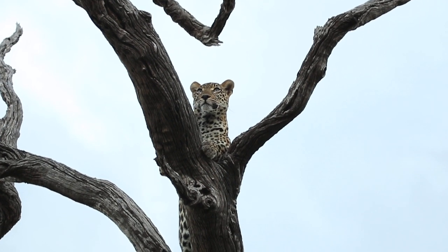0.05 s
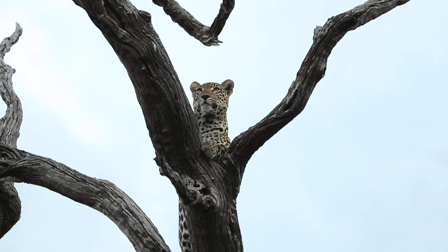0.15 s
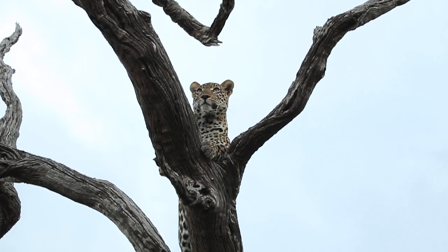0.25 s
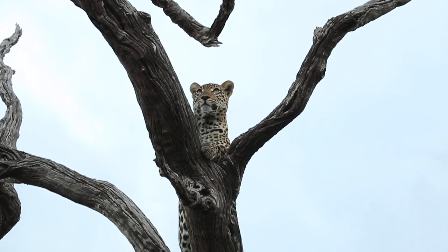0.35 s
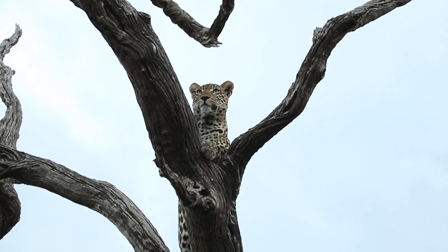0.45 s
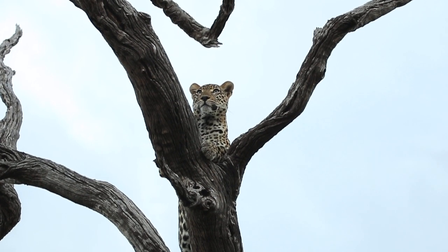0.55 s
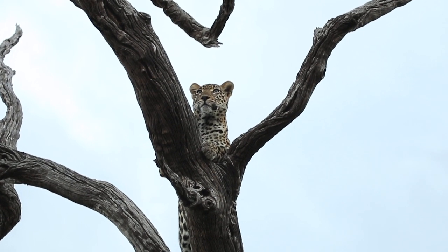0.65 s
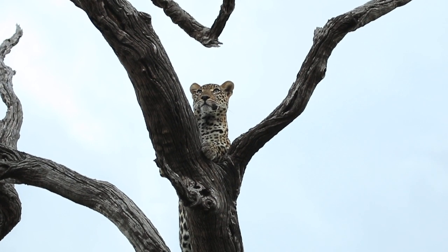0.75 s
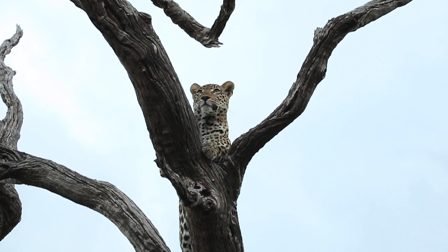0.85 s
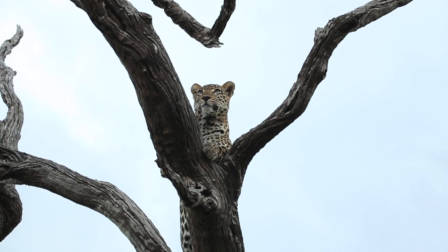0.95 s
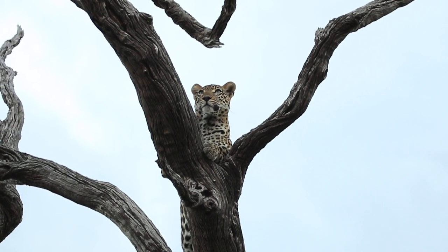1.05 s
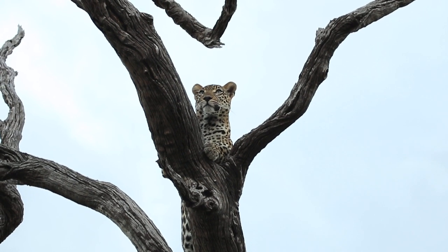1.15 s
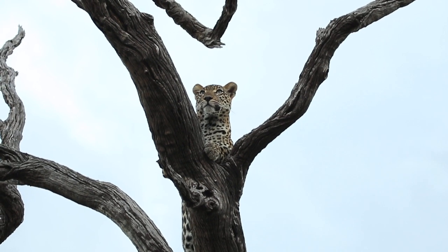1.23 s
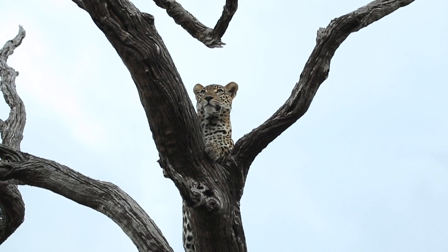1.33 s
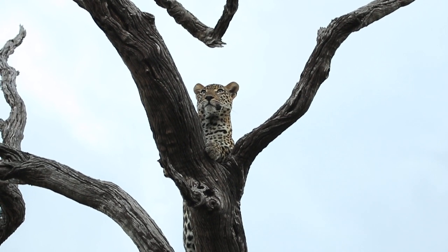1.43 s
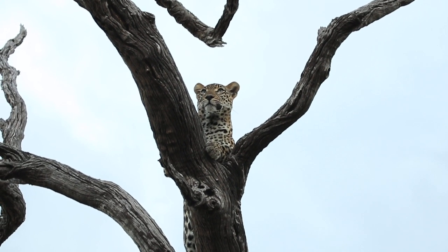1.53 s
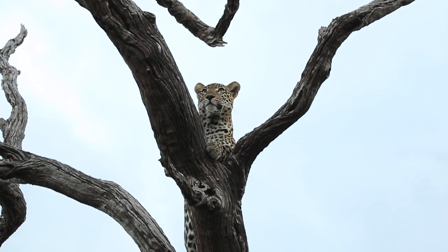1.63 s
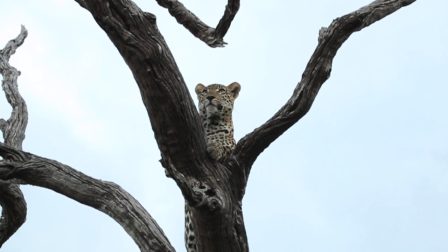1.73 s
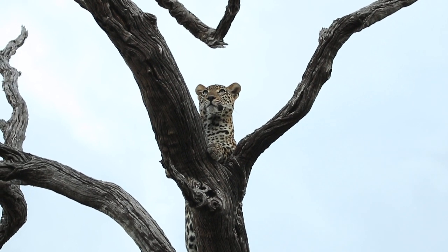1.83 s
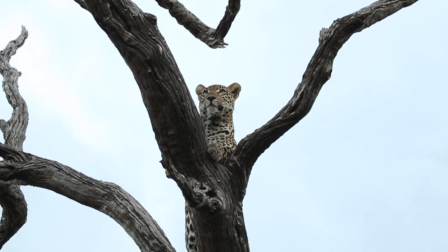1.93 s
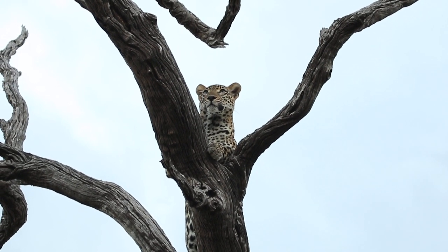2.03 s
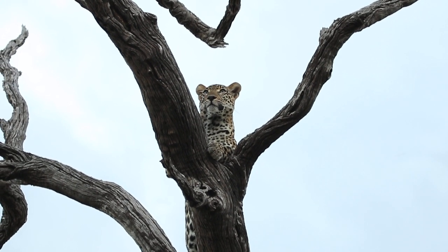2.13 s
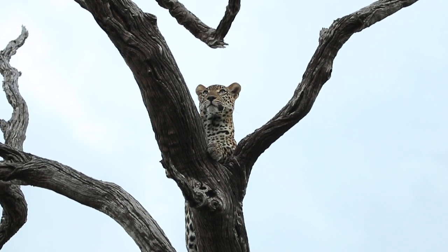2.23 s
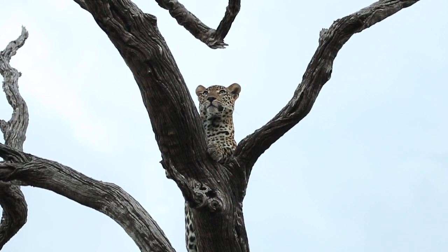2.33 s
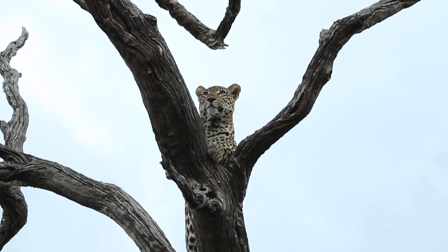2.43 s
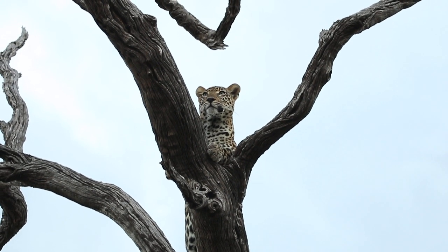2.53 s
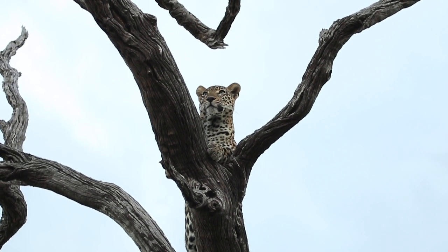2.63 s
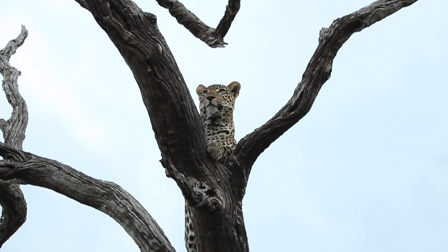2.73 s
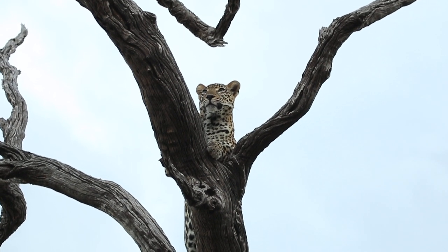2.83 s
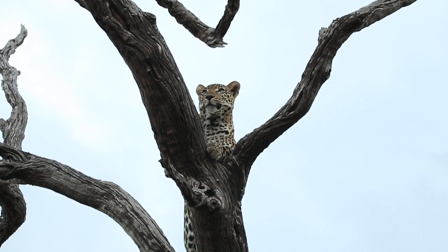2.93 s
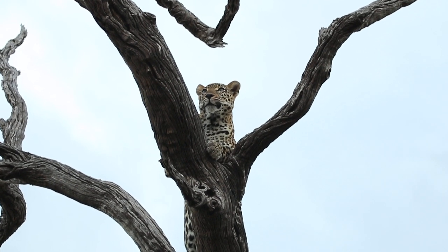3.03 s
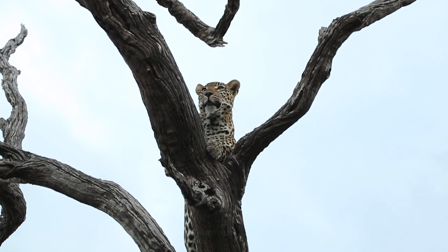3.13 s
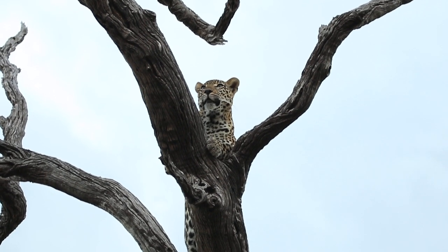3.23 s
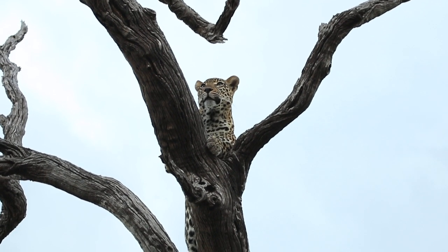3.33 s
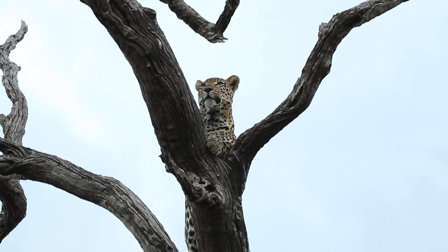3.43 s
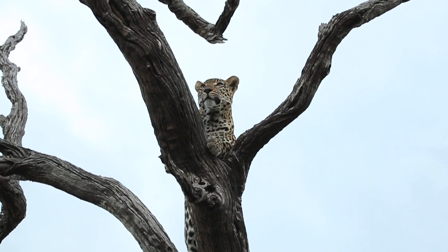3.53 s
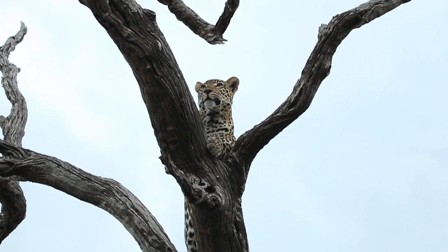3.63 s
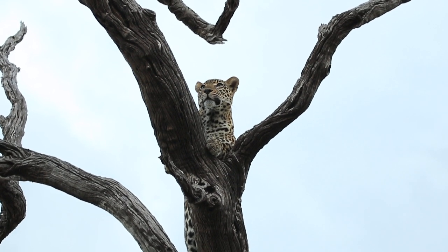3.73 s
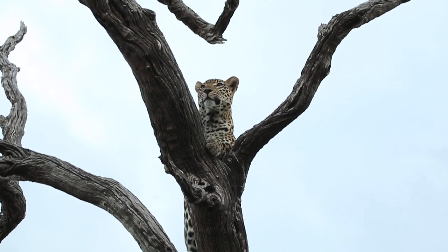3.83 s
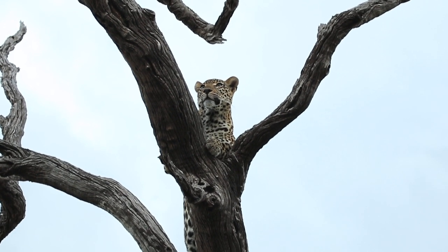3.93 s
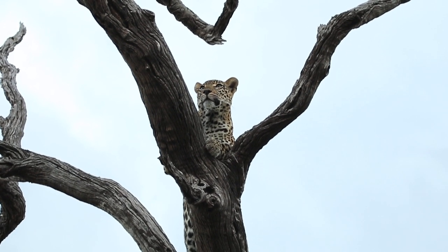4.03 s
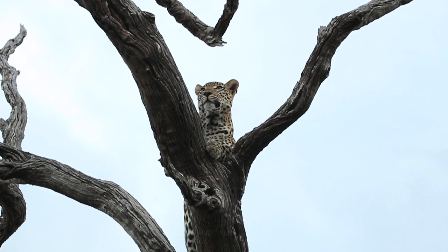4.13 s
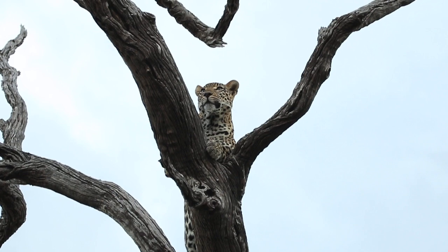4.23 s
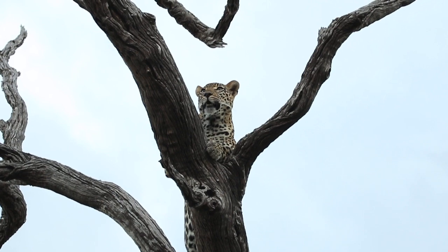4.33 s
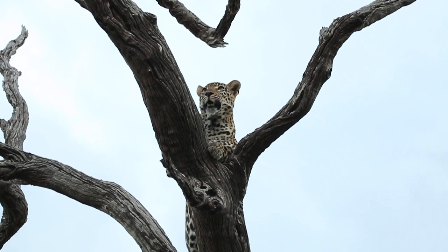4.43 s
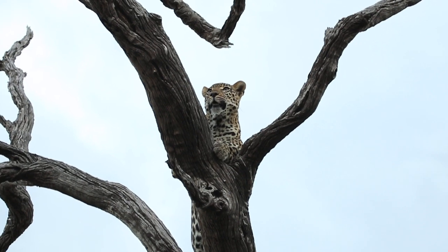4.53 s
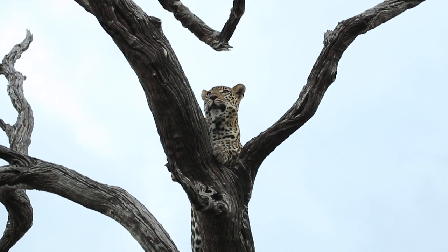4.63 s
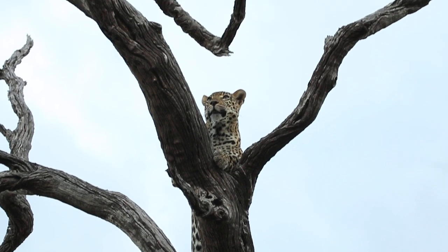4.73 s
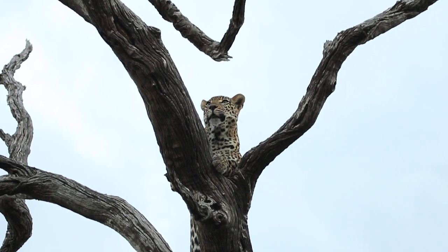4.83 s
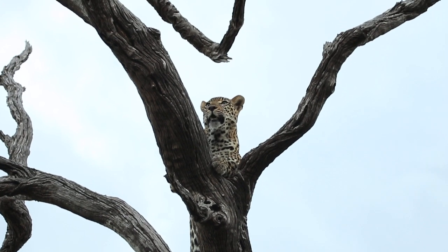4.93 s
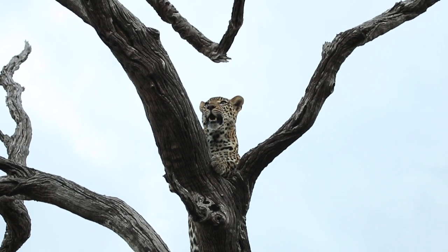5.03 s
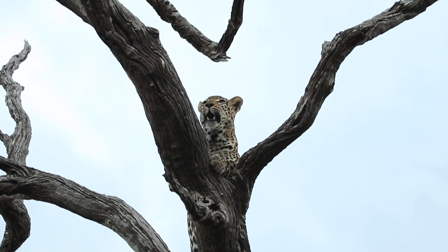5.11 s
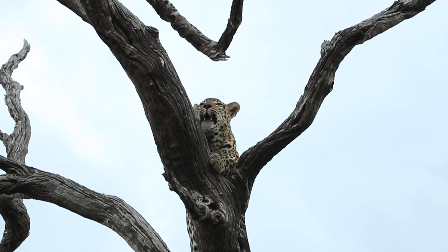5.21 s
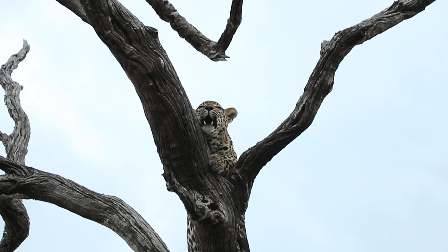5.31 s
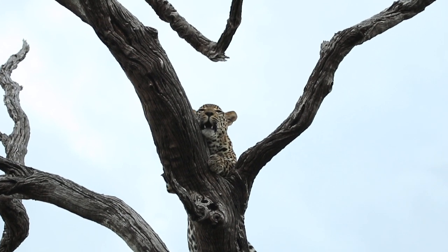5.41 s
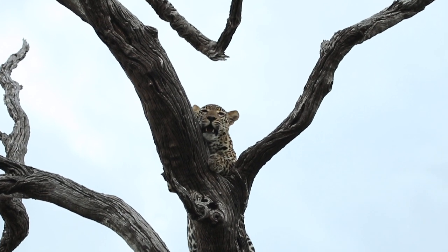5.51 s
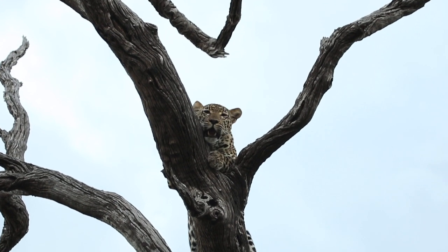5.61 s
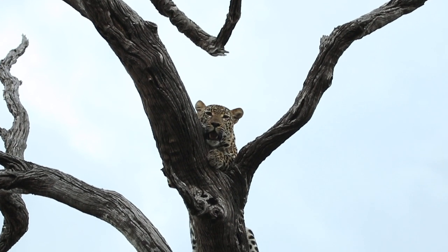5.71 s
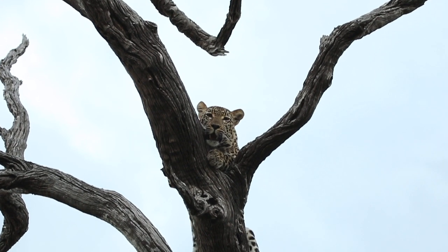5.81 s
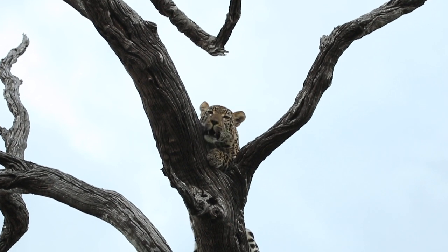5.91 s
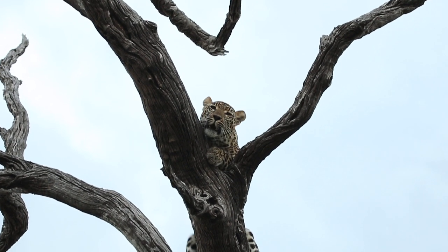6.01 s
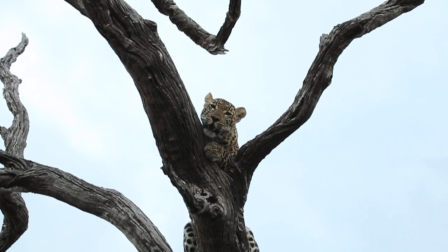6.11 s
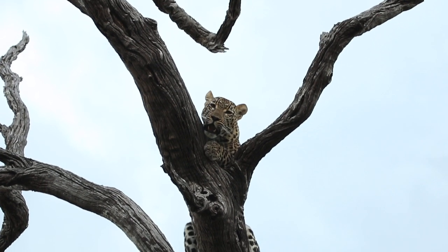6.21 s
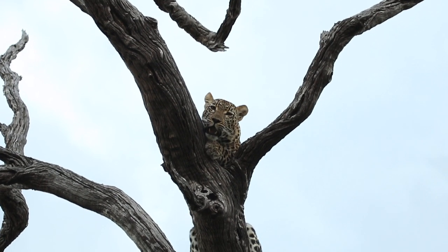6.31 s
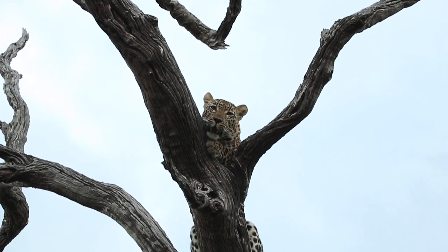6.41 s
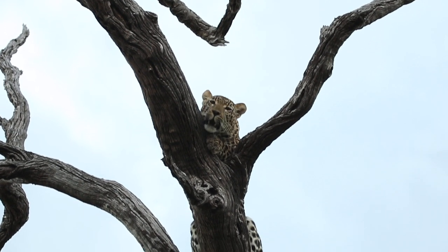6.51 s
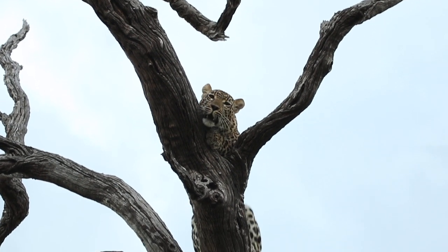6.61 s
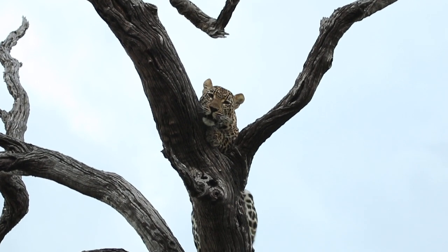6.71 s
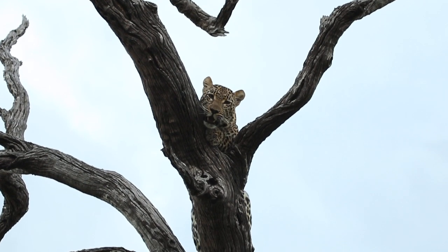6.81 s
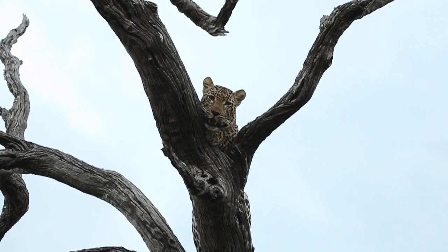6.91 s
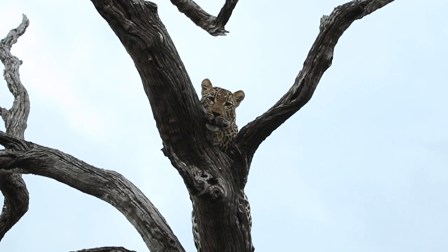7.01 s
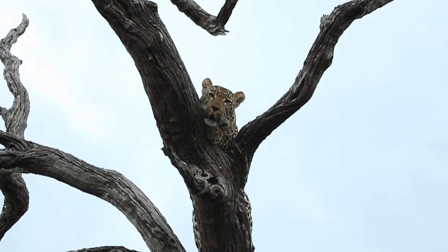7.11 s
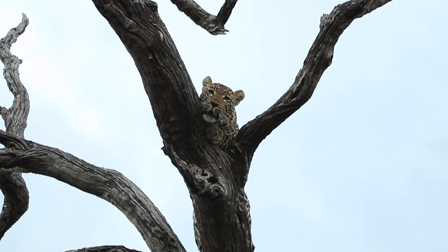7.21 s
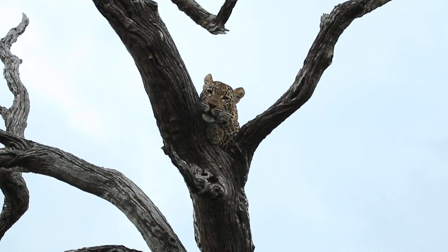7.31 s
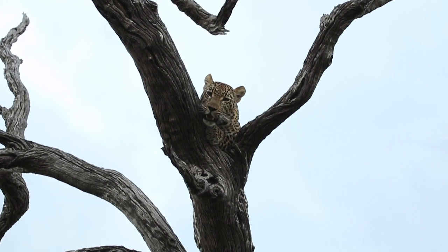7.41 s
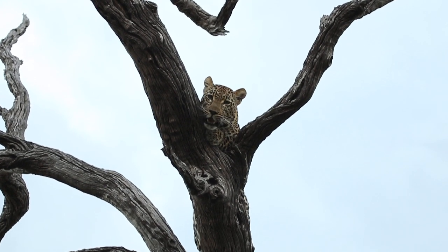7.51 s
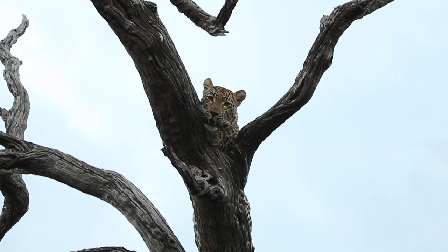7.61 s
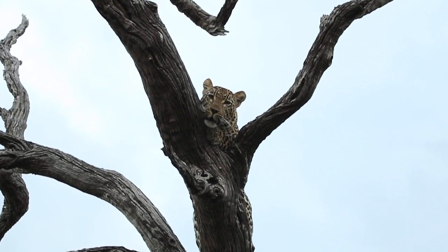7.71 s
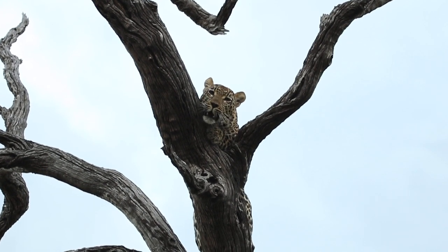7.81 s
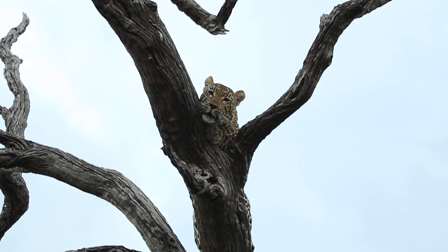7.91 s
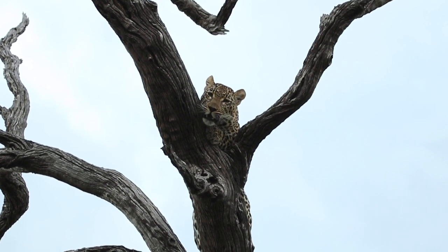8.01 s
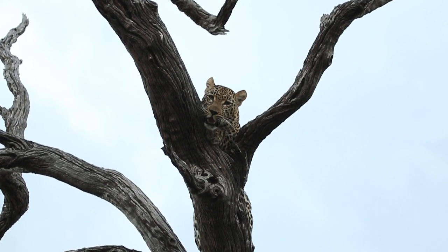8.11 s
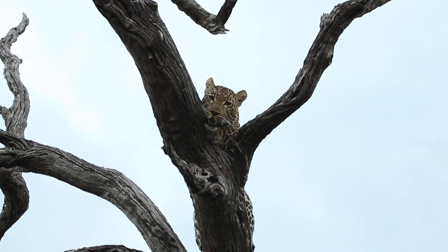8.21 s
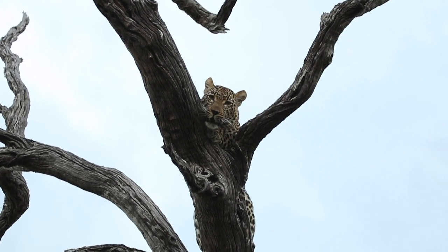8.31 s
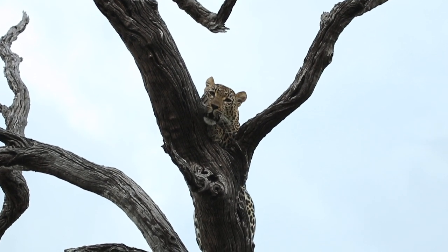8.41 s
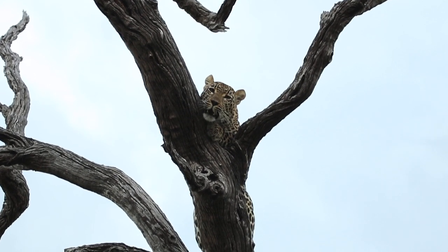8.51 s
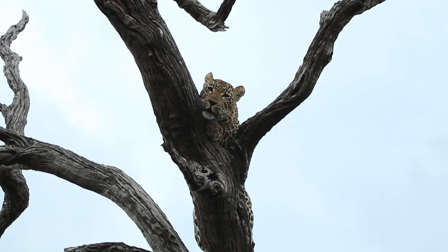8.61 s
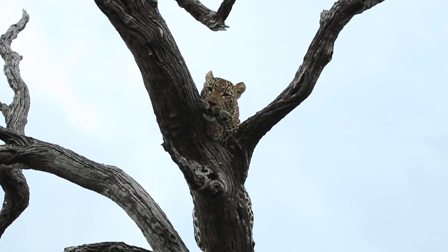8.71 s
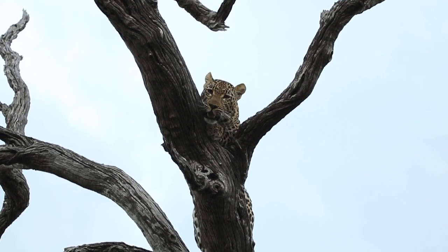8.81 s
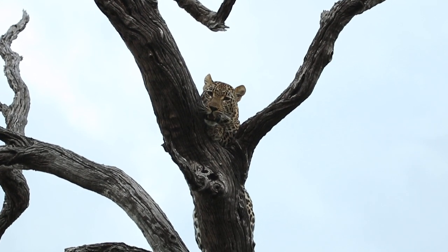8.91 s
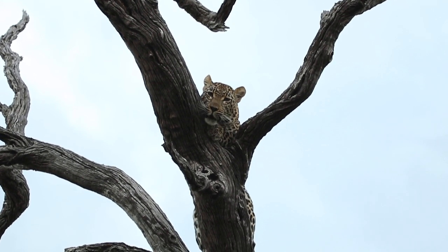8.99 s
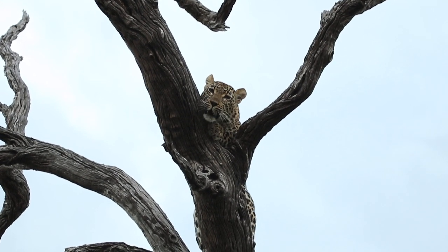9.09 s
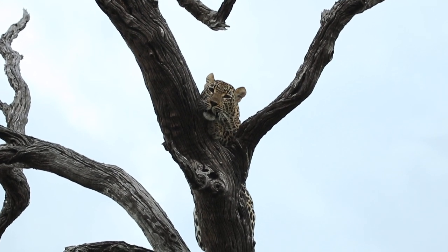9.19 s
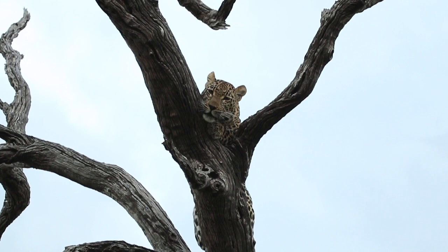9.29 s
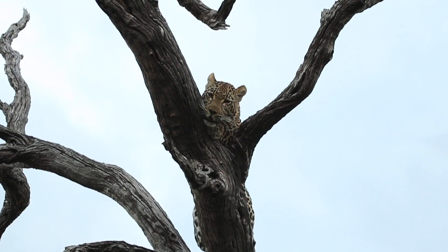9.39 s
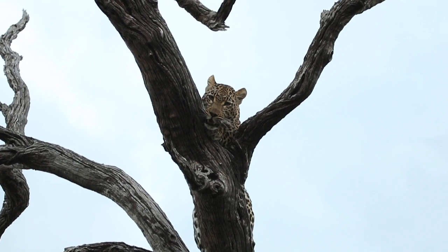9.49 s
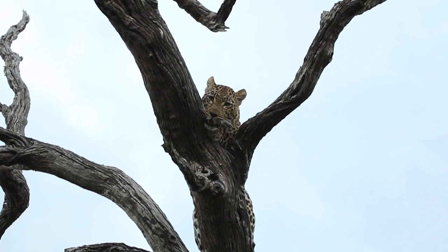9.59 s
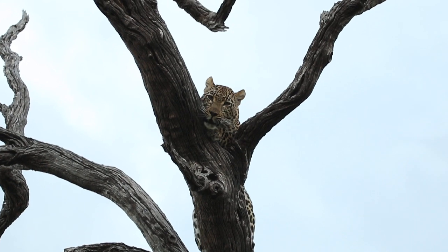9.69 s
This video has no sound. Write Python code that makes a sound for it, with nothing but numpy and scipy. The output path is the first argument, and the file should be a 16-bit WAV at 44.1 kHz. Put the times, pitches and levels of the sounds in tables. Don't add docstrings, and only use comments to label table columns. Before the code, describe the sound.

Outdoors in quiet bush, a low steady wash of air lies very faintly behind everything. In the first 1.2 seconds a distant dove gives soft gliding coos, the first one rolled. A small bird ticks, high and thin, about every 0.3 seconds with pauses until 4.9, while insects trill in fine buzzing strands. Dry twigs click at 2.6 and 3.1, more sharply at 3.7 and 4.05, faintly at 4.8. A soft animal breath comes at 4.4-5.0, then a rattling one at 5.1. From 5.35 the leopard coughs loudly: rough, chesty, buzzing bursts of roughly 0.2 seconds at 5.35, 5.95, 6.55, 7.15, 7.8, 8.45 (softer) and 9.1. Between them come hoarse, fluttering inhalations with slow throaty flaps and wet snaps. A last rattling breath fades around 9.8. Close, dry sound, faint short echoes.

```python
import sys
import numpy as np
from scipy import signal
from scipy.fft import rfft, irfft, next_fast_len
from scipy.io import wavfile
from scipy.ndimage import uniform_filter1d, map_coordinates

SR = 44100
rng = np.random.default_rng(int(sys.argv[2]) if len(sys.argv) > 2 else 0)


def gain_from_db(level_db):
    decades = np.asarray(level_db, float) / 20
    return 10 ** decades


def to_wav(s):
    ch = np.atleast_2d(s).T
    pcm = np.round(np.clip(ch, -1, 1) * 32767)
    wavfile.write(sys.argv[1], SR, pcm.astype(np.int16))


N = 429975
TIME = np.arange(N) / SR

# folds burst open [t/s], rise to peak [s], length to release [s], peak [level/dB], widest jaw [0-1]
COUGH_EVENTS = [
    (5.348, 0.027, 0.15, -12, 0.92),
    (5.961, .01, 0.17, -11, 1.2),
    (6.559, 0.016, 0.19, -12, 0.8),
    (7.156, 0.025, 0.19, -13, 0.83),
    (7.777, 0.025, 0.2194, -12, 0.65),
    (8.461, .02, .19, -15.5, 1.15),
    (9.114, 0.013, 0.23, -12, 0.87),
]
# chest leads burst [s], first push eases over [s], by [dB], release [s], final jaw opening [share]
COUGH_EDGES = [(0.022, 0.033, -3, 0.075, 2.3), (0.021, 0.055, -7, 0.0607, .8), (.016, 0.059, -6, .05, .3),
               (0.021, .04, -4, 0.039, .6), (0.0134, 0.066, -4.5, 0.0537, .1), (0.0274, .07, -1, .09, .1),
               (0.029, .06, -4, .065, .3)]
# [f/Hz], width [Hz], [level/dB]
THROAT_IN_MODES = [(637, 130, -9), (766, 29.6, 3), (900, 93, -6), (1144, 12.4, 2)]
MOUTH_IN_MODES = [(1930, 47, -5.5), (2368, 100, 0.5), (2800, 220, -1), (3150, 210, 0), (3840, 40, 3)]
HISS_IN_MODES = [(4650, 54, -2.5), (5070, 130, 0.5), (6020, 370, -0.5), (6820, 330, -3), (7480, 590, -6.5),
                 (9850, 2500, -9.5)]


def unit(x):
    return x / np.sqrt(np.mean(x ** 2) + 1e-20)


def filtered(x, response):
    m = next_fast_len(len(x) + 8192)
    spectrum = rfft(x, m) * response(np.fft.rfftfreq(m, 1 / SR))
    return irfft(spectrum, m)[:len(x)]


def band(x, low_hz, high_hz):
    sos = signal.butter(3, [low_hz, high_hz], "band", fs=SR, output="sos")
    return unit(signal.sosfilt(sos, x))


def colour(points):
    f, db = np.transpose(points)
    return lambda hz: gain_from_db(np.interp(np.log(hz + 1), np.log(f), db))


def airway(modes, sign=-1):
    return lambda f: sum(sign ** k * gain_from_db(db) * 1j * f * w / (c * c - f * f + 1j * f * w)
                         for k, (c, w, db) in enumerate(modes))


def curves(tables):
    s, *cols = np.transpose(np.concatenate(tables))
    gate = sum((TIME > t[0][0]) & (TIME < t[-1][0]) for t in tables)
    return uniform_filter1d(gate * 1., size=200), *[np.interp(TIME, s, c) for c in cols]


def wobble(rate_hz):
    knots = rng.standard_normal(int(N * rate_hz / SR) + 4)
    return map_coordinates(knots, [TIME * rate_hz])


def patchy(depth_db):
    z = signal.stft(rng.standard_normal(N), nperseg=256)[2]
    field = uniform_filter1d(rng.standard_normal(z.shape), size=2, axis=0)
    field = uniform_filter1d(field, size=7, axis=1)
    return unit(signal.istft(z * gain_from_db(depth_db * unit(field)), nperseg=256)[1][:N])


def rings(s, gain, hz, t60_s, attack_s):
    t = np.arange(SR // 10) / SR
    wave = np.sin(2 * np.pi * np.outer(hz, t)) * gain_from_db(-60 * t / t60_s) * (1 - np.exp(-t / attack_s))
    at = (np.asarray(s) * SR).astype(int)[:, None] + np.arange(len(t))
    return np.bincount(at.ravel(), (wave * np.reshape(gain, (-1, 1))).ravel(), N + SR)[:N]


def puffs(s, gain, t60_s):
    train = np.bincount((np.asarray(s) * SR).astype(int), gain, N + SR)[:N]
    return train, signal.lfilter([1], [1, -gain_from_db(-60 / (t60_s * SR))], train)


def bush():
    # [f/Hz], density [dB per Hz]
    bush_colour = [(12, -45), (20, 11), (98, -10.5), (176, 0), (429, -5), (521, -1), (1140, -10.5),
                   (1500, -10), (1630, -10.5), (5270, -20), (6410, -16.5), (14400, -25), (15600, -27)]
    # [t/s], [level/dB]
    bush_course = [(0.0, -55), (1.81, -55), (2.08, -55), (3.63, -53.5), (4.3, -55)]
    level_db = np.interp(TIME, *np.transpose(bush_course))
    return gain_from_db(level_db + wobble(2.69) / 2) * unit(filtered(rng.standard_normal(N), colour(bush_colour)))


def dove():
    # [t/s], [f/Hz], [level/dB]
    coo_tables = [
        [(.09, 844, -66), (.15, 870, -56), (.2, 968, -69), (.43, 930, -64.5), (.48, 855, -65)],
        [(.585, 844, -61), (.63, 973, -53), (.665, 900, -66)],
        [(1.09, 920, -67), (1.12, 950, -61), (1.16, 860, -66)],
    ]
    gate, hz, db = curves(coo_tables)
    roll = 1 + 1.4 * (np.abs(TIME - .33) < .13) * np.sin(2 * np.pi * 33 * TIME)
    return gate * gain_from_db(db + 5.5) * roll * np.sin(2 * np.pi * np.cumsum(hz) / SR)


def ticking_bird():
    # [t/s], [level/dB]
    tick_events = [(.14, -64), (.41, -65), (.69, -62), (.96, -70), (1.225, -65), (1.5, -65.5), (1.78, -67),
                   (2.585, -66), (3.15, -64), (3.44, -64), (4.03, -68), (4.29, -66), (4.58, -67),
                   (4.85, -64)]
    out = np.zeros(N)
    for s, db in tick_events:
        u = np.clip((TIME - s) / .03, 0, 1)
        out += gain_from_db(db + 5.5) * np.sin(np.pi * u) * np.sin(2 * np.pi * .03 * (6650 * u - 520 * u * u))
    return out


def insects():
    insect_songs = [
        (1.25, 1.43, 0, -69),
        (1.47, 1.75, 0, -64),
        (3.43, 3.95, 0, -64),
        (2.515, 2.685, 1, -59),
        (.7, 2.25, 2, -71),
        (3.35, 4.85, 2, -69),
        (.75, 2.0, 3, -72),
        (2.6, 3.9, 3, -71),
        (4.6, 5.1, 3, -71),
    ]
    # f/Hz, sweep [Hz], chirps [per s], shortness of chirp [exponent]
    insect_kinds = [
        (3600, 120, 56.4, 1),
        (5150, 600, 51.84, 2.5),
        (6430, 200, 65.5, 1),
        (6010, 200, 64, 1),
    ]
    out = np.zeros(N)
    sway = wobble(40)
    for start, end, kind, db in insect_songs:
        hz, sweep_hz, rate_hz, short = insect_kinds[kind]
        u = np.clip((TIME - start) / (end - start), 0, 1)
        cycle = (rate_hz * TIME) % 1
        pitch_hz = hz + sweep_hz * (1 - 2 * cycle + .12 * sway)
        song = np.sin(np.pi * cycle) ** short * np.sin(2 * np.pi * np.cumsum(pitch_hz) / SR)
        level_db = db + 7.5 + 2.0 * np.roll(sway, round(start * SR))
        out += gain_from_db(level_db) * np.sin(np.pi * u ** 2.0) ** 0.14 * song
    return out


def twigs():
    # [t/s], peak [level/dB], thud [dB re peak], crumble [dB re peak]
    twig_events = [
        (2.5778, -42, 10, -14),
        (3.0855, -38, -13, -8),
        (3.7178, -27, -23, -23),
        (4.0529, -28, -0.5, -7.5),
        (4.79, -42, -12, -19),
    ]
    s, db, thud_db, crumble_db = np.transpose(twig_events)
    crack = puffs(s, gain_from_db(db), t60_s=0.016)[1] * rng.standard_normal(N)
    crumble = puffs(s, gain_from_db(db + crumble_db), t60_s=.3)[1] * patchy(1.5)
    thud = rings(s, gain_from_db(db + thud_db), 320 + 0 * s, t60_s=0.011, attack_s=0.00091)
    return filtered(crack, airway([(2060, 1060, 0)])) + filtered(crumble, airway([(2830, 470, 0)])) + thud


def echoes(x):
    t = np.arange(SR // 3) / SR
    tail = rng.standard_normal(len(t)) * gain_from_db(-60 * t / 0.32)
    tail = filtered(tail, colour([(100, -23), (800, -9.5), (8000, -10.0)]))
    return signal.fftconvolve(np.pad(x, (600, 0)), tail / np.linalg.norm(tail))[:N]


def snaps():
    # [t/s], peak [level/dB], bright part [dB re peak]
    snap_events = [(5.174, -29, 12), (5.219, -14, -12), (5.259, -23, -3), (5.338, -10.5, -13),
                   (5.364, -8, -8.5), (5.395, 0.5, -22), (5.827, -12, -13), (5.945, -11.5, -11),
                   (6.239, -15.5, -16), (6.285, -19, -5), (6.305, -22.5, -1), (6.479, -9.5, -22),
                   (6.56, -9, -15), (5.963, -13, -16), (6.573, -8, -14), (6.605, -7.5, -12),
                   (6.946, -19, -13), (8.463, -10, -5), (9.115, -7, -15), (7.157, -13.5, -6),
                   (7.19, -6.5, -10), (7.718, -7.5, -24), (7.776, -16, -4.5), (8.2, -28, 3),
                   (8.443, -13, -13.5), (8.866, -15.5, -17), (9.1, -10.5, -18), (9.606, -15.5, -16),
                   (9.654, -17.5, -18)]
    s, db, bright_db = np.transpose(snap_events)
    low = puffs(s, gain_from_db(db + 15.0), t60_s=0.021)[1] * rng.standard_normal(N)
    high = puffs(s, gain_from_db(db + bright_db + 8), t60_s=0.024)[1] * rng.standard_normal(N)
    throat = filtered(low, airway(THROAT_IN_MODES, sign=0.85))
    mouth = filtered(high, airway(MOUTH_IN_MODES + HISS_IN_MODES))
    return filtered(throat + mouth, lambda f: 1 / (1 + 1j * f / 5000) ** 2)


def breath_effort():
    breath_events = [
        (4.38, 4.48, 4.58, -49.5),
        (4.585, 4.704, 4.97, -49.5),
        (5.074, 5.246, 5.32, -27),
        (5.615, 5.848, 6.09, -26),
        (6.206, 6.447, 6.57, -25),
        (6.836, 7.065, 7.165, -22.5),
        (7.435, 7.701, 7.76, -21),
        (8.093, 8.359, 8.43, -22.5),
        (8.75, 9.02, 9.44, -26.5),
        (9.425, 9.7, 9.86, -24),
    ]
    # swell depth [share], throat [dB re chest], mouth [dB re chest]
    breath_air = [(0.26, -3, -4), (0.14, -5, -9), (1.08, 5, 11), (1, 3, -1), (0.61, 3.5, 1),
                  (0.94, 0.5, -0.5), (0.86, 0.5, -0.5), (0.86, 1, 3), (0.64, 3.5, 3), (0.91, -0.5, -2.5)]
    tables = []
    for (start, full, end, db), (depth, throat_db, mouth_db) in zip(breath_events, breath_air):
        at = [start + (full - start) * share for share in (0, .35, .72, 1)] + [end]
        swell_db = [depth * -22.5, depth * -13, depth * -4.5, 0, -14 * min(1, 2 * depth)]
        level_db = db + np.array(swell_db)
        tables.append(np.transpose([at, level_db, level_db + throat_db, level_db + mouth_db]))
    return curves(tables)


def flap_times():
    rattle_events = [(4.485, .034, .58, 3), (4.65, .015, .95, 3), (5.092, .024, .5, 2),
                     (5.117, .022, .62, 4), (5.613, .041, .546, 6), (6.256, .013, .708, 7),
                     (6.843, .04, .417, 6), (7.445, .017, .5, 2), (7.55, .015, .4, 5), (8.101, .012, .5, 2),
                     (8.205, .028, .12, 5), (8.77, .037, .382, 7), (9.448, .04, .613, 6),
                     (9.729, .02, .5, 1)]
    # strength [dB re chest level], chest [f/Hz]
    rattle_flaps = [(6, 190), (7, 193), (1.5, 177), (11.5, 222), (7.5, 228), (7, 201), (7.5, 213), (7, 200),
                    (6.5, 204), (7, 200), (8.5, 221), (11.5, 210), (4, 203), (9, 186)]
    tight_gap_s, unstick_db = .033, 1
    flaps = []
    for (s, slack_s, kept, count), (db, hz) in zip(rattle_events, rattle_flaps):
        for k in range(count):
            slack_sum_s = slack_s * (1 - kept ** k) / (1 - kept)
            flaps.append((s + tight_gap_s * k + slack_sum_s, db + unstick_db * (k == 0), hz))
    return np.transpose(flaps)


def breaths():
    # [f/Hz], width [Hz], [level/dB]
    throat_early = [(623, 96, 0), (810, 170, -2), (1054, 69, 6.5), (1240, 60, -4)]
    mouth_early = [(1580, 89, -1), (1866, 250, 7), (2260, 210, 7.5), (2760, 350, 9), (3800, 130, -5)]
    # [f/Hz], width [Hz], [level/dB]
    chest_in = [(201, 96, 8), (330, 330, -11.5)]
    # [f/Hz], width [Hz], [level/dB]
    chest_soft = [(190, 35, 0)]
    gate, chest_db, throat_db, mouth_db = breath_effort()
    s, flap_db, flap_hz = flap_times()
    chance = rng.standard_normal((len(s), 2))
    db = np.interp(s, TIME, chest_db) + flap_db + 0.82 * chance[:, 0]
    hz = flap_hz + 12.3 * chance[:, 1]
    knock = rings(s - .002, gain_from_db(db), hz, t60_s=.036, attack_s=.03)
    puff = puffs(s, gain_from_db(2.6 * rng.standard_normal(len(s))), t60_s=0.071)[1]
    duty = np.sqrt(np.mean(gate))

    def air(leak, modes, low_hz, high_hz):
        flow = (puff + leak) * gate * patchy(3.4)
        return duty * band(filtered(flow, airway(modes, sign=0.82)), low_hz, high_hz)

    early, soft = TIME < 5.33, TIME < 5
    murmur = np.where(soft, 2.2, .35)
    throat = np.where(early, air(murmur, throat_early, 620, 1280), air(0.61, THROAT_IN_MODES, 580, 1174))
    mouth = np.where(early, air(murmur, mouth_early, 1660, 4500), air(0.54, MOUTH_IN_MODES, 1270, 4300))
    chest = np.where(soft, air(3, chest_soft, 140, 260), air(.5, chest_in, 105, 420))
    hiss = air(0.38, HISS_IN_MODES, 5060, 12500)
    return (gain_from_db(23) * knock + gain_from_db(chest_db - 4) * chest + gain_from_db(throat_db - 13) * throat
            + gain_from_db(mouth_db) * (gain_from_db(-14.5) * mouth + gain_from_db(-24) * hiss))


def cough_effort():
    jaw_course = [0.97, 0.064, 0.57, 1, 0.16]
    lead_db, sag_db_per_s, release_db = -22, -55, -33.5
    tables = []
    for (s, rise, length, db, opening), (lead, ease, ease_db, release, last) in zip(COUGH_EVENTS, COUGH_EDGES):
        settled = rise + ease
        widest = (settled + length) / 2
        at = [-lead, rise, settled, widest, length, length + release]
        widest_db = ease_db + sag_db_per_s * (widest - settled)
        end_db = ease_db + sag_db_per_s * (length - settled)
        level_db = [lead_db, 0, ease_db, widest_db, end_db, end_db + release_db]
        jaw = [*opening * np.array(jaw_course), last]
        tables.append(np.transpose([s + np.array(at), db + np.array(level_db), jaw]))
    return curves(tables)


def cough_arch():
    # start [f/Hz], top [f/Hz], larynx sinks [t/s], after [f/Hz]
    chest_arches = [(268, 265, 5.46, 247), (247, 257, 6.085, 210), (242, 246, 6.7, 202),
                    (234, 235, 7.29, 208), (217.4, 248, 7.94, 206), (226, 251, 8.61, 208),
                    (206.7, 247, 9.26, 200)]
    pharynx_course = (732, 720, 690.5, 750, 748)
    climb_s, sink_s = .085, 0.0459
    tables = []
    for cough, edge, (start_hz, top_hz, sink, low_hz) in zip(COUGH_EVENTS, COUGH_EDGES, chest_arches):
        s, length, lead, release = cough[0], cough[2], edge[0], edge[3]
        at = [s - lead, s - lead + climb_s, sink - sink_s / 2, sink + sink_s / 2, s + length + release]
        tables.append(np.transpose([at, [start_hz, top_hz, top_hz, low_hz, low_hz], pharynx_course]))
    return curves(tables)[1:]


def coughs():
    # [f/Hz], width [Hz], [level/dB]
    throat_out = [(578, 14, -2.5), (675, 29, -3), (765, 32, -0.5), (860, 10, 0.5), (1010, 7.6, -1),
                  (1230, 22, -14)]
    mouth_out = [(1632, 53, 7.5), (2010, 75, 0), (2120, 53, -10), (2374, 38, -4), (2543, 58, -2.5),
                 (2825, 58, -4), (3400, 44, -7.5), (3890, 51, -10)]
    # [f/Hz], density [dB per Hz]
    hiss_out = [(2470, -5.5), (4200, -7), (4610, -5.5), (4950, -4), (5380, -3.5), (7950, -5), (9370, -11.5),
                (14000, -18), (15600, -31)]
    gate, chest_db, jaw = cough_effort()
    chest_hz, pharynx_hz = cough_arch()
    throat_db = -7 + 5 * jaw
    mouth_db = -15 + 4.5 * jaw
    hiss_db = -24 + 11.5 * jaw + 0.11 * (chest_db + 13.5)

    bursts = np.transpose(COUGH_EVENTS)[0]
    burst = bursts[np.clip(np.searchsorted(bursts - .04, TIME) - 1, 0, None)]
    beat = np.cumsum(63 * (1 + .07 * wobble(30))) / SR
    at = np.flatnonzero(np.diff(np.floor(beat - beat[(burst * SR).astype(int)])))
    size = gain_from_db(2.4 * rng.standard_normal(len(at)))
    size = size * gain_from_db(3.5 * np.exp(-np.abs(at / SR - burst[at] - .02) / 0.052))
    train, puff = puffs(at / SR, size, t60_s=0.056)

    def swell(t60_s, leak):
        return uniform_filter1d(puffs(at / SR + 0.0035, size, t60_s)[1], size=260) + leak

    def tone(hz, drift):
        return np.sin(2 * np.pi * np.cumsum(hz * (1 + drift * wobble(60))) / SR)

    def air(leak, depth_db):
        return unit((puff + leak) * patchy(depth_db))

    chest = unit(swell(.1, .35) * (1 + .3 * wobble(160)) * tone(chest_hz, .018))
    overtones = unit(swell(.1, .35) * (tone(3 * chest_hz, .01) + .7 * tone(4 * chest_hz, .01)))
    body = airway([(160, 80, -8), (315, 50, 0), (370, 60, -14)], sign=1)
    chest += .25 * band(filtered(patchy(3), body), 110, 400)
    chest += 0.038 * np.sin(2 * np.pi * beat)
    pharynx = unit(swell(.06, .25) * gain_from_db(3.5 * wobble(25)) * tone(pharynx_hz, .015))
    pulses = unit(train)
    throat = band(filtered(1.3 * pulses + air(.22, 2.5), airway(throat_out, sign=1)), 550, 1300)
    mouth = band(filtered(.55 * pulses + air(.18, 3), airway(mouth_out, sign=1)), 1500, 4400)
    hiss = unit(filtered(air(.5, 2.8), colour(hiss_out)))

    bright = gain_from_db(throat_db) * unit(throat + 0.73 * pharynx + 0.17 * overtones)
    bright = bright + gain_from_db(mouth_db) * mouth + gain_from_db(hiss_db) * hiss
    open_db = np.where(TIME < burst, -9, 3 * gain_from_db(-60 * np.abs(TIME - burst) / 0.11))
    return gate * gain_from_db(chest_db) * (chest + gain_from_db(open_db) * bright)


def scene():
    background = bush() + dove() + ticking_bird() + insects() + twigs()
    cat = snaps() + breaths() + coughs()
    return (background + cat + gain_from_db(-17) * echoes(cat))[None]


def band_limit(x):
    return signal.sosfilt(signal.butter(12, 15780, fs=SR, output="sos"), x)


def record(dry):
    cut = signal.sosfilt(signal.butter(2, 70, "high", fs=SR, output="sos"), dry)
    cut = cut / (1 + np.abs(cut / .98) ** 8) ** (1 / 8)
    mix = filtered(cut[0], lambda hz: hz < 15780)[None]
    return band_limit(mix)


dry = scene()
out = record(dry)
to_wav(out)
```